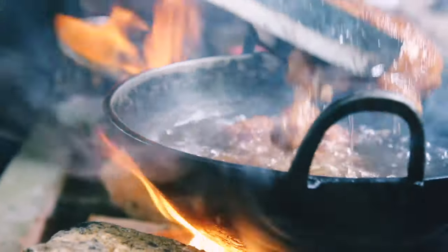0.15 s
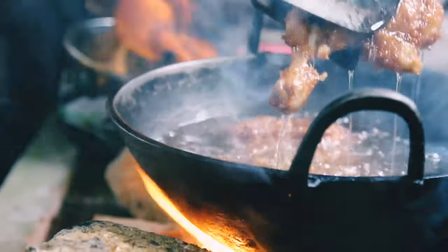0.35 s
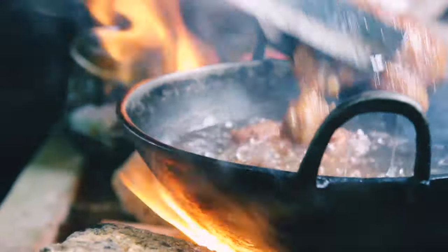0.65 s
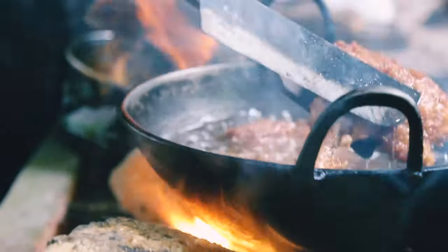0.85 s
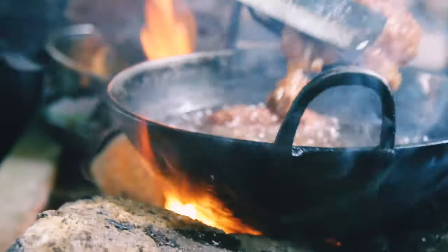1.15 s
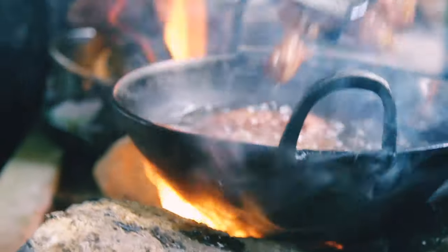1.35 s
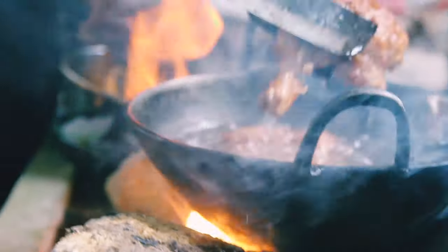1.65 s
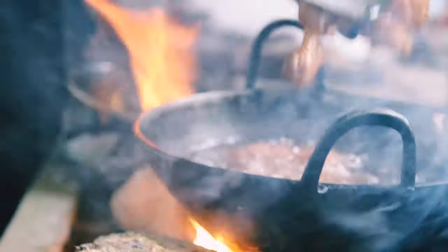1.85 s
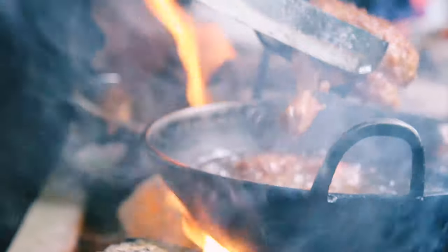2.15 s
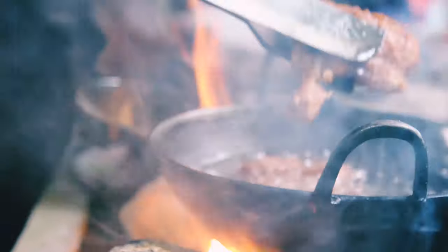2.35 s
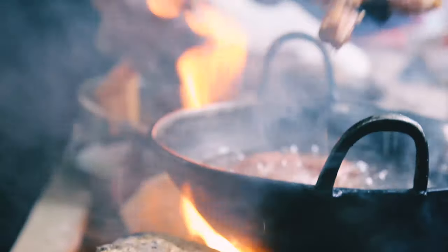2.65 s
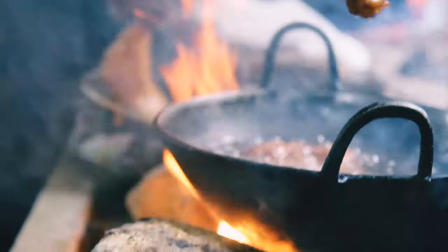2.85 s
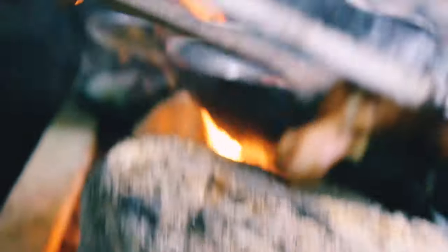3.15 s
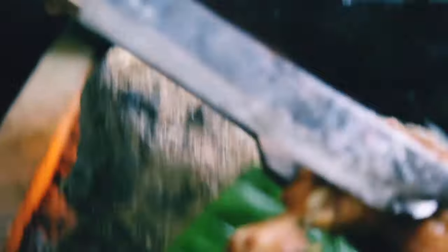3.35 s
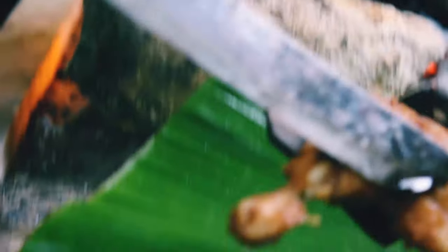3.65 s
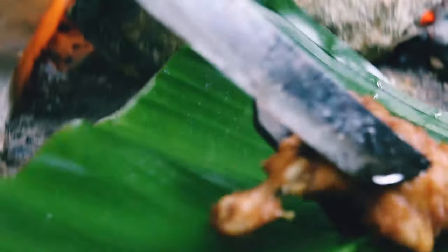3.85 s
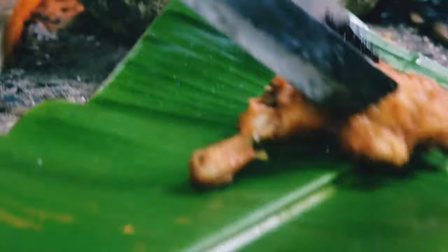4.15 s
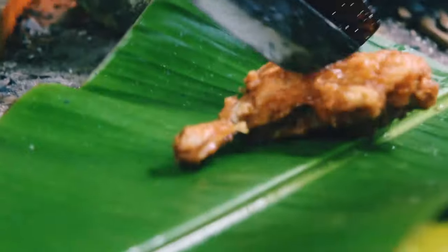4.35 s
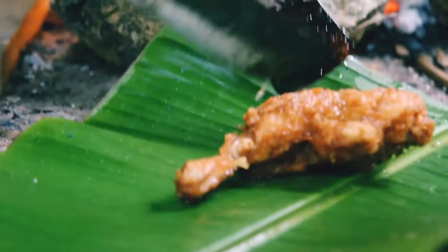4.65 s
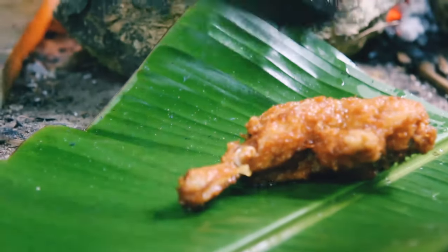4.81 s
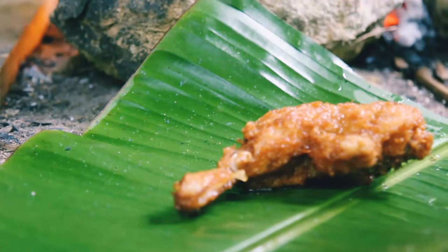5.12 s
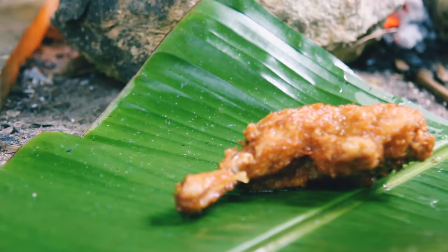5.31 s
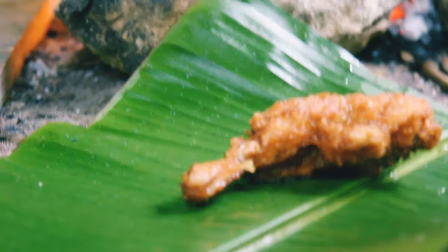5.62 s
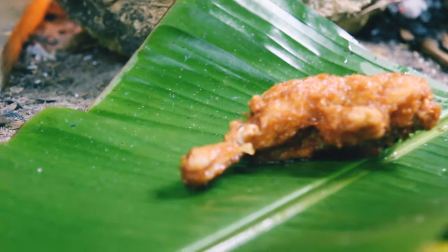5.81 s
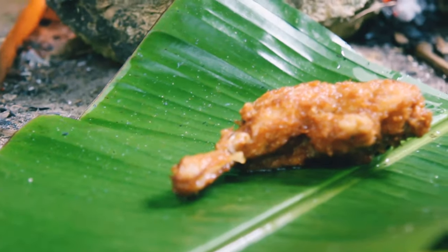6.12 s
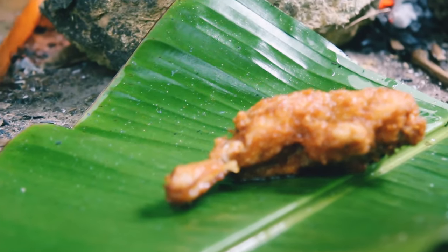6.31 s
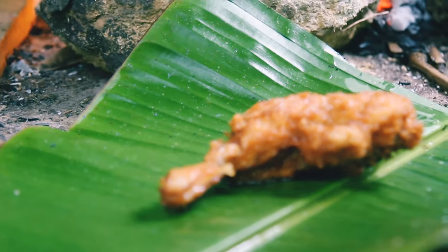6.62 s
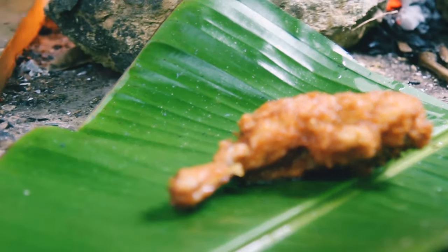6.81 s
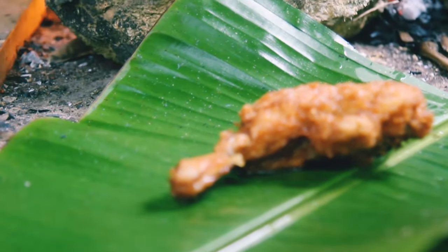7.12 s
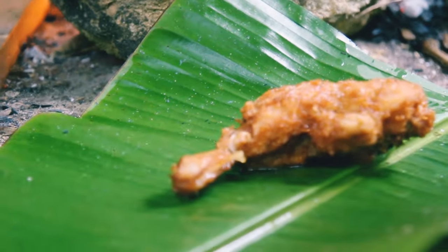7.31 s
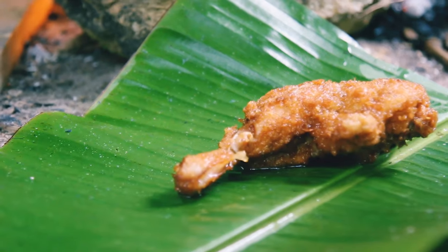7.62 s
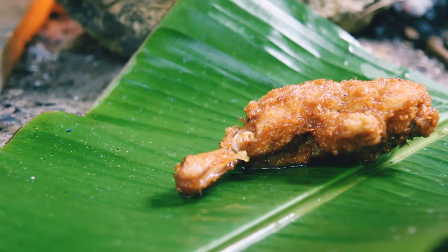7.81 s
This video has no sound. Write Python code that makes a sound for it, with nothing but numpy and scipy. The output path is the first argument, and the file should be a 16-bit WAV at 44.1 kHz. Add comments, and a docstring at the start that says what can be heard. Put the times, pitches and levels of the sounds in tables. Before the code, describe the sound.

A loud, steady oil sizzle, fizzy and crackling, is peppered with hard pops as water drops burst. It sounds wide and close, with no room echo. Then it cuts off, exposing a soft, hollow fire rumble with irregular puffs and fine ember ticks. Wood drops and bounces in a quick dry clatter, scrapes briefly, and thin, high sparks snap, one much louder near the end.

```python
"""Frying over a wood fire

Breaded chicken fries in a wok outdoors: resonant bubble bursts over noise make the sizzle, and decaying
cosines with noise tails the loud spits. The sizzle stops abruptly and leaves the fire: resonant noise
rumbles and hisses, short ringing bursts are snapping sparks and ticking embers, and a piece of firewood
settles with a cluster of dry knocks (noise and decaying modes) and a short scrape (swelling noise)."""
import sys
import numpy as np
from scipy import signal
from scipy.fft import rfft, irfft, next_fast_len
from scipy.io import wavfile
from scipy.ndimage import uniform_filter1d

SR = 44100
rng = np.random.default_rng(int(sys.argv[2]) if len(sys.argv) > 2 else 0)


def file_out(sig):
    """Save sig as 16-bit WAV at sys.argv[1]."""
    # one column per channel
    cols = np.atleast_2d(sig).T
    # limit, then scale
    lim = np.clip(cols, -1, 1)
    pcm = np.round(lim * 32767).astype(np.int16)
    wavfile.write(sys.argv[1], SR, pcm)


N = 351477
TIME = np.arange(N) / SR
SIZE = next_fast_len(N)
FREQS = np.maximum(np.arange(SIZE // 2 + 1) * SR / SIZE, 1)
FRYING_ENDS_S = 5.588

# left-right correlation of the fire's sound: frequency_hz, likeness
FIRE_LIKENESS = [(30, 0.24), (130, 1), (400, 0.93), (700, 0.51), (1200, 0.14), (1800, 0.98), (3500, 0.97),
                 (6000, 0.41), (12000, 0.13)]


def sizzle():
    """Superposition: near bubbles crackle in clusters over the smooth fizz of countless tiny ones."""
    # vigour of the frying: start_s, level_db
    vigour = [(0.0, -29.5), (0.18, -29.5), (0.42, -30.5), (0.6, -29.5), (1.95, -30), (2.92, -29),
              (3.4, -29.5), (3.92, -29), (4.2, -30.5), (5.0, -30), (5.24, -31), (5.55, -30)]
    # fresh, wet crust fizzes brighter and dries out: start_s, treble_db
    crust_treble = [(0, 5.5), (1, -0.5), (2, -1.5), (3, 1), (5.6, -3)]
    # spectrum of the bursting bubbles together: frequency_hz, density_db (per Hz)
    oil_spectrum = [(290, -15), (500, -1), (749, -13.5), (943, -4.5), (1060, -12.5), (1310, -6.5),
                    (1520, -11.5), (1850, -7), (2100, -5.5), (2320, -1.5), (2520, -5.5), (3850, -0.5),
                    (4550, -1), (5000, -3), (5450, -.5), (6150, 0.1), (7000, -2), (7400, -2), (10800, -7.5),
                    (14800, -15), (15700, -15)]
    # left-right correlation: frequency_hz, likeness
    oil_likeness = [(500, 0.72), (1000, 0.56), (2200, 0.76), (4400, 0.53), (7500, 0.24), (12000, 0.023)]
    fade_s = 0.0091
    flicker_db, flicker_hz = 0.62, 17  # the bubbles come in irregular surges

    (level_db,), (treble_db,) = in_time(vigour), in_time(crust_treble)
    bursts_per_s = 7000 * from_db(2.0 * drift(45))
    pair = []
    for _ in range(2):
        crackle = bubbles(bursts_per_s, spread_db=2.5, cycles=1.76)
        fizz = from_db(-4.5) * rng.standard_normal(N)
        small = from_db(-9.5) * plinks(0.0073, spread_db=7.5, rise_per_s=0.05, count=3000)
        large = from_db(-10.5) * plinks(0.024, spread_db=3.5, rise_per_s=0.0022, count=1800)
        pair.append(wok_echoes(crackle + fizz + small + large))
    low_cut = 1 / np.sqrt(1 + (350 / FREQS) ** 4)
    oil = stereo(np.array(pair), from_db(at_hz(oil_spectrum)) * low_cut, oil_likeness)
    treble = filtered(oil, 1 / (1 + (8500 / FREQS) ** 8))
    oil = oil + treble * (from_db(treble_db) - 1)
    sounding = np.clip((FRYING_ENDS_S - TIME) / fade_s, 0, 1)
    return oil * sounding * from_db(level_db + flicker_db * drift(flicker_hz))


def bubbles(per_s, spread_db, cycles, count=16):
    """Random impulses excite a bank of resonators: bubbles burst, mostly small, each ringing a few cycles."""
    patchy_db, patchy_hz = 0.66, 15  # each bubble size comes and goes by itself
    out = np.zeros(N)
    for hz in np.geomspace(800, 14000, count):
        chance = per_s * np.sqrt(hz / 4000) / count / SR
        born = np.flatnonzero(rng.random(N) < chance)
        strength_db = spread_db * np.minimum(rng.exponential(1, len(born)), 5)
        clicks = np.full(N, 1e-18)
        clicks[born] = from_db(strength_db) * rng.choice([-1, 1], len(born))
        b, a = signal.iirpeak(min(hz, SR / 3), max(cycles, 1), fs=SR)
        ringing = rms_one(signal.lfilter(b, a, clicks))
        out += ringing * np.sqrt(hz) * from_db(patchy_db * drift(patchy_hz))
    # the bank as a whole is evened out, so that only the oil colours it
    hz, power = signal.welch(out, SR, nperseg=SR // 200)
    return colour(out, np.interp(FREQS, hz, power) ** -.5)


def plinks(ring_s, spread_db, rise_per_s, count):
    """Damped oscillation: whole bubbles ring on under the surface, rising slightly in pitch."""
    out, t = np.zeros(N), TIME[:round(5 * ring_s * SR)]
    for when, pitch, size, life in rng.random((count, 4)):
        hz = 700 + 13000 * pitch ** 1.2
        fade = np.exp(-t / (ring_s * (.5 + life)))
        tone = np.sin(2 * np.pi * hz * t * (1 + rise_per_s * t))
        add(out, when * FRYING_ENDS_S, from_db(spread_db * size ** 3) * fade * tone)
    return rms_one(out)


def wok_echoes(x):
    """Early reflection: the bursting spots wander over the oil, so their bounces off the wall keep shifting."""
    # bounces off the wok's wall: delay_s
    wall_delays = [0.001083, .0027, .0046]
    share, wander = 0.076, .05  # gain of each bounce; greatest relative change of its delay
    echoes = 0
    for delay_s in wall_delays:
        lag = delay_s * SR * (1 + wander * np.tanh(drift(.6)))
        echoes = echoes + x[np.maximum(np.arange(N) - lag.astype(int), 0)]
    return x + share * echoes


def spits(ring_cycles=0.83):
    """Impulsive expansion: drops of water flash to steam in the oil, one sharp crack, then a short spatter."""
    # oil spitting: start_s, crack_db, pitch_hz, spatter_db
    drops = [(0.1786, -15, 7500, -30), (0.3777, -14, 4200, -35), (0.734, -28, 760, -29),
             (0.9246, -12, 3000, -28), (1.088, -10, 7000, -26), (1.1, -26, 1190, -30),
             (1.1988, -9.5, 2430, -30), (1.3558, -10, 4600, -31), (1.4442, -10, 11000, -38),
             (1.7583, -19, 4320, -36), (1.906, -9, 5800, -33), (1.959, -10, 10500, -38),
             (2.015, -8, 3900, -26), (2.112, -27, 800, -33), (2.1655, -10, 8000, -30),
             (2.2009, -7, 6200, -30), (2.3055, -12, 9000, -37), (2.4273, -18, 6200, -35),
             (2.9015, -28, 1100, -34), (3.0215, -6, 6450, -27), (3.397, -12, 5300, -22),
             (3.4236, -5, 5860, -34), (3.5727, -28, 1000, -31), (3.6567, -9, 6200, -33),
             (3.7257, -14, 7000, -23), (3.8006, -12, 3400, -28), (4.381, -12, 3900, -30),
             (4.765, -16, 6000, -30), (5.3646, -10, 3000, -29), (5.3935, -7.5, 6200, -35),
             (5.533, -16, 6000, -30)]
    spatter_t60_s = .03
    out, t = np.zeros(N), TIME[:SR // 10]
    for s, db, hz, spatter_db in drops:
        crack = np.cos(2 * np.pi * hz * t) * np.exp(-hz * t / ring_cycles)
        add(out, s, from_db(db) * crack)
        spatter = rms_one(band(rng.standard_normal(len(t)), hz / 2, hz * 2))
        add(out, s, spatter * from_db(spatter_db - 60 * t / spatter_t60_s))
    return out


def firewood():
    """Modal excitation: wood drops, bounces and slides; every contact is a crunch that sets modes ringing."""
    # contacts: start_s, level_db (before a 2 dB cut), t60_s, brightness_hz (low-pass), hollow_note_hz
    contacts = [(6.2203, -19.5, 0.092, 10000, 484), (6.2298, -21.5, 0.084, 10000, 434),
                (6.2448, -24, 0.12, 5000, 540), (6.264, -31, .1, 2000, 580),
                (6.2836, -25.5, 0.09, 3400, 577), (6.2957, -26, .12, 1000, 580),
                (6.346, -37, .025, 5000, 664), (6.388, -36, 0.034, 5000, 1005),
                (6.4115, -27, 0.025, 7000, 576), (6.422, -38, .025, 4020, 1340),
                (6.432, -29, 0.025, 4000, 550), (6.444, -35, .035, 3000, 517), (6.455, -37, .02, 3500, 620),
                (6.468, -27.5, 0.04, 7000, 557)]
    # spectrum of the wood's body: frequency_hz, density_db (per Hz)
    wood_spectrum = [(35, -33), (60, -5), (170, -2), (264, -8), (380, -7), (512, -3), (674, -4.5),
                     (906, -12), (1050, -7.5), (1600, -3), (1950, -11), (2750, -9.5), (3350, -7.5),
                     (3750, -2), (4600, -9.5), (5400, -9.5), (7500, -11.5), (10200, -12), (12000, -23),
                     (14000, -34)]
    # modes of the wood's body: frequency_hz, level_db (relative), t60_s
    wood_modes = [(507, 1, 0.16), (810, 4.5, 0.089), (906, 1, 0.17), (1143, -1, 0.18), (1603, 1.5, 0.12),
                  (1740, 6, 0.091), (2080, 3.5, 0.089), (2450, 3.5, 0.14), (3700, 7.5, 0.12),
                  (4080, 8, 0.07), (5080, 6, 0.07), (5430, 5, 0.07), (6770, 4, 0.093)]
    # sliding after the blow, which catches and stops: centre_s, level_db, half_length_s (to 1/e)
    slides = [(6.33, -47.5, 0.06), (6.437, -42.5, 0.053)]
    crunch_db, strike_spread_db = 1, 2.5  # grain of a contact; how unevenly it strikes the modes
    ringing_db, clonk_db, clonk_t60_s = -12, -8, 0.13  # clonk: hollow note of the spot that is struck
    contact_cycles = 4  # a duller contact also takes longer to build up
    first_s, _, first_t60, *_ = contacts[0]

    out, t = np.zeros(N), TIME[:SR // 3]
    grain = rng.standard_normal(N) * from_db(crunch_db * drift(600))
    body = colour(grain, from_db(at_hz(wood_spectrum)))
    for s, db, t60, bright_hz, note_hz in contacts:
        crunch = body[round(s * SR):][:len(t)] * from_db(-60 * t / t60)
        ringing = 0
        for hz, mode_db, mode_t60 in wood_modes:
            struck_db = mode_db + strike_spread_db * rng.standard_normal()
            tone = np.sin(2 * np.pi * (hz * t + rng.random()))
            ringing = ringing + from_db(struck_db - 60 * t / mode_t60) * tone
        # brief, light touches hardly wake the modes
        ringing = ringing * from_db(ringing_db) * min(t60 / first_t60, 1)
        clonk = from_db(clonk_db - 60 * t / clonk_t60_s) * np.sin(2 * np.pi * note_hz * t)
        b, a = signal.butter(1, min(bright_hz, SR / 3), fs=SR)
        softened = signal.lfilter(b, a, crunch + ringing + clonk)
        onset = 1 - np.exp(-t * bright_hz / contact_cycles)
        add(out, s, from_db(db - 2.0) * softened * onset)
    sliding = sum(from_db(db) * swell(s, half_s) for s, db, half_s in slides)
    # sliding is duller than a blow, and catches on the bark
    slide = rms_one(band(body, 280, 2900)) * sliding * from_db(3.3 * drift(300))
    # the ground shudders briefly under the blow
    thud = colour(rng.standard_normal(N), 1 / (1 + (FREQS / 45) ** 4))
    since = TIME - first_s
    return out + slide + thud * (since > 0) * from_db(-40 - 60 * np.abs(since) / 1.4)


def swell(s, half_s):
    """Gaussian envelope: a smooth rise and fall around a moment; top 1."""
    return np.exp(-np.minimum(((TIME - s) / half_s) ** 2, 50))


def sparks(t60=0.22, grain_db=2.5):
    """Impulse and scattering: each spark snaps once and comes back in small echoes from all around."""
    # start_s, snap_db (before the final band-pass), tail_db, pitch_hz, width_octaves, left_minus_right_db
    spark_events = [(0.1512, -7, -39, 10200, .5, 0), (5.7252, -22, -47, 9800, .3, 0),
                    (5.727, -20, -37, 9750, .25, 0), (5.742, -36, -44, 12000, .3, 0),
                    (5.8335, -38, -44, 11400, .15, 0), (5.887, -14, -33.5, 10800, 0.63, 0),
                    (6.0675, -30, -45, 7600, 0.69, 2), (6.140, -38, -44, 10400, 0.78, 0),
                    (6.546, -32, -36.5, 11400, .6, 0), (6.623, -34, -37, 6000, 0.77, 0),
                    (6.627, -26, -38, 9800, 0.51, 0), (6.633, -29, -45, 6200, .9, 0),
                    (6.863, -30, -45, 10000, .5, 1), (6.908, -31, -46, 9800, .5, 0),
                    (7.054, -31, -34.5, 10700, .7, 2), (7.0855, -26, -40, 8000, 0.97, 0),
                    (7.173, -31, -49, 10500, .6, 0), (7.275, -38, -49, 6500, .8, 0),
                    (7.4919, -6, -30, 10260, 0.79, -4), (7.5115, -25, -41, 11100, .6, 1.5),
                    (7.853, -35, -43, 11500, 0.59, 0), (7.93, -28, -39, 9800, 0.9, 2)]
    scatter_swell_s = 0.00054
    snaps, tails, t = np.zeros((2, N)), np.zeros((2, N)), TIME[:SR // 4]
    for s, snap_db, tail_db, hz, octaves, pan_db in spark_events:
        noise, width = rng.standard_normal((3, len(t))), 2 ** (max(octaves, .05) / 2)
        # the shared third noise makes the two sides partly alike
        scatter = rms_one(band(noise[:2] + 0.89 * noise[2], hz / width, hz * width))
        onset = 1 - np.exp(-t / scatter_swell_s)
        add(tails, s, scatter * onset * from_db(tail_db - 60 * t / t60))
        sides_db = snap_db + pan_db * np.array([[.5], [-.5]])
        add(snaps, s, from_db(sides_db) * snap(hz, decay_s=0.00016, grit=0.7, width=width))
    # sparks are too small to sound in the middle range
    return band(snaps, 6000, 13500) + tails * rms_one(from_db(grain_db * drift(400)))


def snap(hz, decay_s, grit, width=1.7):
    """Damped impulse: a few cycles of ringing mixed with torn noise; peak 1."""
    t = TIME[:SR // 100]
    width = max(width, 1.05) if width < 1.05 else width
    torn = rms_one(band(rng.standard_normal(len(t)), hz / width, hz * width))
    ringing = np.sin(2 * np.pi * hz * t) + grit * torn
    burst = ringing * t * np.exp(-t / decay_s)
    return burst / np.abs(burst).max()


def flames():
    """Turbulence and resonance: the fire rumbles, rushes, and hisses out of the wood."""
    # broad rush of the flames: frequency_hz, density_db (per Hz)
    rush_spectrum = [(20, -0.5), (45, 1), (100, 3.5), (400, -1.5), (700, -4.5), (1300, -12.5), (2600, -9),
                     (3800, -15.5), (4800, -11.5), (5600, -20), (7500, -11.5), (9800, -6.5), (12500, -13.5),
                     (15500, -25)]
    # gas hissing out of the wood: frequency_hz, width_hz, level_db (relative)
    hiss_modes = [(1827, 144, 3), (3394, 220, -3.5), (4270, 136, -2), (6300, 230, -10.5), (8960, 230, -9)]
    rush = stereo(rng.standard_normal((2, N)), from_db(at_hz(rush_spectrum)), FIRE_LIKENESS)
    hiss = stereo(rng.standard_normal((2, N)), resonances(hiss_modes), FIRE_LIKENESS)
    return rumble() + from_db(-45.5 + 1.9 * drift(13)) * rush + from_db(-48.5) * hiss


def rumble():
    """Cavity resonance: the hollow under the wok booms; each register swells with flares near its pitch."""
    # hollow resonances: frequency_hz, width_hz, level_db (relative)
    hollow_modes = [(65, 7.3, -13.5), (127.6, 4.6, 1), (140, 14.8, 0), (202.7, 14.3, 1.5),
                    (244.6, 13.6, -3), (259, 10.7, -4), (286.3, 7.2, 0.5), (312, 14, -10),
                    (344.6, 9.2, -7.5), (380.6, 16, -11.5), (457, 21.6, -5), (542, 34, -16),
                    (605, 13, -15.5), (797, 34, -18.5), (1130, 42, -22.5)]
    # centres of the overlapping registers: frequency_hz
    registers = [135, 205, 280, 460]
    hollow, out = stereo(rng.standard_normal((2, N)), resonances(hollow_modes), FIRE_LIKENESS), 0
    for hz, own in zip(registers, np.eye(len(registers))):
        part = filtered(hollow, np.interp(FREQS, registers, own))
        # slow chance swells of the noise are evened out before the flares shape it
        power = uniform_filter1d(part.mean(axis=0) ** 2, size=SR // 10)
        out = out + part * np.sqrt(power.mean() / power) * from_db(draught(hz))
    return out


def draught(hz):
    """Amplitude modulation: level in dB of a fluttering burn that flares near one pitch."""
    # the flames flare up: centre_s, rise_db, half_length_s (to 1/e), pitch_hz, half_width_octaves (to 1/e)
    flare_events = [(0.06, 7, .04, 160, 0.48), (0.276, 8, 0.046, 280, .35), (0.43, 7.5, .05, 151, 0.55),
                    (0.547, 5.5, 0.044, 200, 1), (0.698, 6.5, 0.047, 290, .3), (0.79, 9, .035, 177, 0.38),
                    (0.94, 11, 0.055, 365, 0.52), (1.35, 8, 0.14, 315, 0.39), (1.58, 1, 0.032, 205, .3),
                    (1.85, 8, .04, 135, .3), (1.993, 7.5, 0.062, 200, .45), (2.083, 8, 0.042, 190, 1.2),
                    (2.26, 4.5, 0.075, 270, 1.2), (2.423, 7.5, 0.032, 190, .9), (2.81, 6.5, 0.044, 205, .3),
                    (3.0, 0, .04, 135, .3), (3.103, 6, 0.033, 290, 0.89), (3.22, 6, .05, 160, 1.1),
                    (3.38, 11, 0.03, 195, .7), (3.57, 2, .06, 135, .3), (3.75, 9.5, .045, 250, 0.37),
                    (4.085, 4, .06, 210, 0.63), (4.217, 6.5, 0.072, 205, 0.25), (4.46, 7, 0.042, 290, .9),
                    (4.707, 6, .035, 175, 0.43), (4.91, 9, 0.045, 184, 0.56), (5.203, 9, .07, 330, 1.3),
                    (5.373, 10.5, 0.041, 190, 0.72), (5.75, 6, 0.053, 240, 0.44), (6.14, 5, .06, 190, 0.36),
                    (6.45, 6, .055, 260, .8), (6.7, 2, .03, 205, .3), (6.91, 9.5, .05, 185, 0.48),
                    (7.207, 9.5, 0.063, 283, 1.15), (7.62, 7, .055, 266, 0.35), (7.76, 8, .05, 145, .5),
                    (7.88, 5.5, .05, 200, 0.98)]
    steady_db, flutter_db, flutter_hz = -40.5, 1.77, 8.5
    t = TIME[::SR // 200]
    flares = 0
    for s, db, half_s, pitch, octaves in flare_events:
        nearness = (np.log2(hz / pitch) / octaves) ** 2
        flares = flares + db * np.exp(-nearness - ((t - s) / half_s) ** 2)
    return steady_db + np.interp(TIME, t, flares) + flutter_db * drift(flutter_hz)


def embers(level_db=-48, count=170):
    """Random impulses: glowing wood ticks faintly all the time."""
    out = np.zeros((2, N))
    for when, pitch, size, place in rng.random((count, 4)):
        # up to 10 dB above the faintest tick
        tick = from_db(level_db + 10 * size ** 2) * snap(8000 + 5000 * pitch, decay_s=0.0004, grit=0.7)
        add(out, when * TIME[-1], tick * np.sqrt([[place], [1 - place]]))
    return out


def from_db(db):
    """Logarithmic level: decibels to amplitude gain."""
    return 10 ** (np.asarray(db) / 20)


def rms_one(x):
    """Normalisation: scale to unit power."""
    return x / np.sqrt(np.mean(x ** 2) + 1e-20)


def in_time(rows):
    """Linear interpolation: each column of a curve, at every sample."""
    s, *columns = np.transpose(rows)
    return [np.interp(TIME, s, c) for c in columns]


def at_hz(points, hz=FREQS):
    """Logarithmic pitch: read a spectrum on a log-frequency axis."""
    point_hz, values = np.array(points).T
    return np.interp(np.log(hz), np.log(point_hz), values)


def resonances(modes):
    """Resonance: gain of a set of peaks with steep skirts, summed in power."""
    power = 0
    for hz, width, db in modes:
        power = power + from_db(db) ** 2 / (1 + ((FREQS - hz) / width) ** 2) ** 2
    return np.sqrt(power)


def filtered(x, gain):
    """Linear filtering: weight a sound by frequency."""
    return irfft(rfft(x, SIZE) * gain, SIZE)[..., :N]


def colour(x, gain):
    """Spectral shaping: weight a sound by frequency; rms 1."""
    return rms_one(filtered(x, gain))


def band(x, low, high):
    """Band limitation: causal band-pass."""
    sos = signal.butter(2, [low, min(high, .45 * SR)], "band", fs=SR, output="sos")
    return signal.sosfilt(sos, x)


def drift(rate):
    """Low-passed noise: chance fluctuation with rms 1, slower for a lower rate in Hz."""
    noise = rng.standard_normal(SIZE // 16)
    slow = irfft(rfft(noise) / (1 + (FREQS[:len(noise) // 2 + 1] / rate) ** 2))
    return np.interp(TIME, np.linspace(0, TIME[-1], len(slow)), rms_one(slow))


def stereo(pair, gain, likeness):
    """Interchannel correlation: two unrelated sounds become left and right, alike by pitch; centre rms 1."""
    alike = np.clip(at_hz(likeness), -.99, .99)
    side_share = np.sqrt((1 - alike) / (1 + alike))
    mid, side = filtered(pair, gain * np.array([np.ones_like(alike), side_share]))
    return np.array([mid + side, mid - side]) / np.std(mid)


def add(out, s, sound):
    """Superposition: mix a short sound in at a time."""
    start = round(s * SR)
    out[..., start:start + sound.shape[-1]] += sound[..., :N - start]


def scene(right_db=0.29):
    """Level panning: the wok sits slightly to the right, above the fire."""
    wok_and_fire = sizzle() + spits() + flames() + sparks() + embers()
    return wok_and_fire * from_db(np.array([[-right_db], [right_db]])) + firewood()


def record(dry):
    """Low-pass filtering: the top is cut steeply."""
    cutoff_hz = 15650
    return filtered(dry, 1 / np.sqrt(1 + (FREQS / cutoff_hz) ** 200))


dry = scene()
out = record(dry)
file_out(out)
```